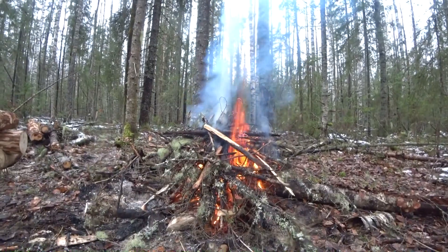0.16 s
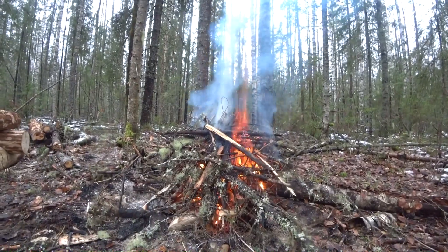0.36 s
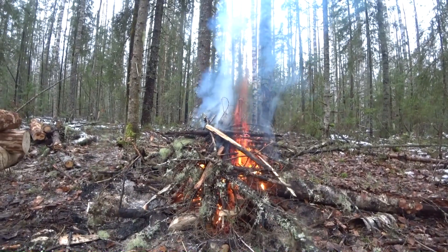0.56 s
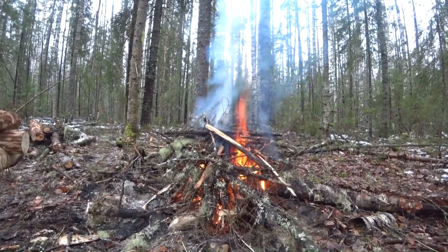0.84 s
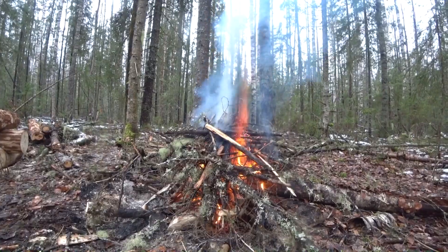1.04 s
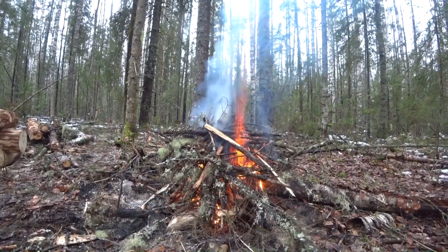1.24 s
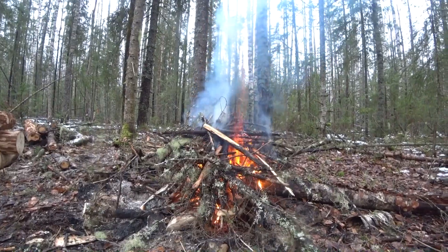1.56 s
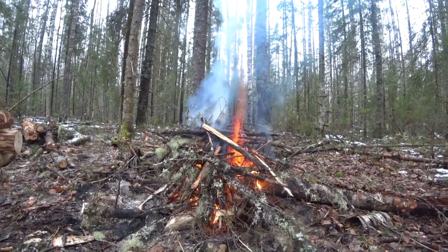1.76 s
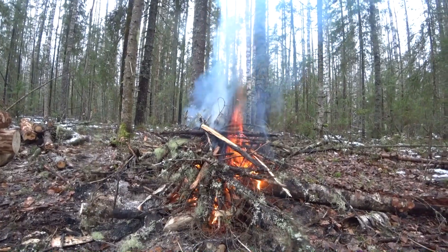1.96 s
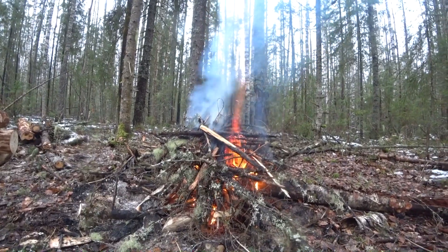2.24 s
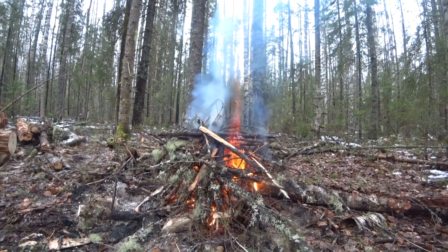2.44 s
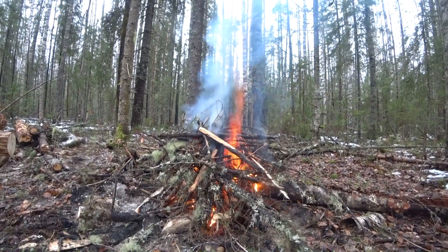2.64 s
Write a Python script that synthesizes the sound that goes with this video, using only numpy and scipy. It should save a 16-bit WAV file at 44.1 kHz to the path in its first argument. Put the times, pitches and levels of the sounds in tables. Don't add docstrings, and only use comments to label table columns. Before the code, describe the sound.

Sharp bright fire pops come in uneven clusters from the start, the strongest near the middle, with fine ticking between them; quiet steady hiss and low rumble sit beneath, outdoors, close stereo microphone, slight scatter from trees.

```python
import sys
import numpy as np
from scipy import signal
from scipy.fft import rfft, irfft, next_fast_len
from scipy.io import wavfile

SR = 44100
rng = np.random.default_rng(int(sys.argv[2]) if len(sys.argv) > 2 else 0)


def transcribe(signal):
    frames = np.atleast_2d(signal).T
    limited = np.clip(frames, -1, 1)
    pcm = np.round(limited * 32767).astype(np.int16)
    wavfile.write(sys.argv[1], SR, pcm)


def amplitude_ratio(level_db):
    exponent = np.asarray(level_db, float) / 20
    return 10 ** exponent


N = 123479

# start in [s], peak in [dB],
# ring in [Hz], thump relative to the peak in [dB].
SNAPS = [(0.2207, -20.5, 3300, -38), (0.2474, -15.5, 6160, -19), (0.2918, -9.5, 4700, -12),
         (0.2944, -9.5, 6650, -32), (0.43, -17, 4060, -22), (0.4945, -13, 6500, -51),
         (0.5039, -11.5, 6160, -47), (0.638, -16.5, 4220, -29), (0.7873, -14, 5130, -19.5),
         (0.7958, -8, 5020, -62.5), (0.8499, -17.5, 5400, -44), (0.8746, -15, 5060, -26),
         (0.9639, -16, 2830, -49), (1.0007, -17, 7500, -44), (1.0094, -21, 6600, -26),
         (1.0108, -12.5, 5100, -24), (1.029, -20, 4300, -17), (1.2717, -15, 7460, -54),
         (1.4167, -11.5, 7800, -58), (1.5104, -6.5, 4700, -58), (1.5126, -12, 6070, -40),
         (1.5136, -21, 2550, -47), (1.5201, -15.5, 3980, -40), (1.5275, -21, 3600, -40),
         (1.6133, -19.5, 4300, -29), (1.7128, -9.5, 6780, -27.5), (1.7667, -13.5, 6000, -59),
         (1.9983, -17.5, 3830, -18.5), (2.0203, -13, 9700, -26), (2.0211, -11.5, 4530, -32),
         (2.29, -16, 4760, -22), (2.2928, -11, 4700, -14.5), (2.3269, -19, 4700, -43),
         (2.5028, -8.5, 6200, -55.5), (2.5226, -14.5, 4500, -14), (2.5366, -16, 6400, -53)]
# start in [s], peak in [dB], ring in [Hz].
EARLY_TICKS = [(0.0303, -32.5, 1680), (0.0332, -27, 6900), (0.074, -27, 900), (0.093, -28, 6600),
               (0.1012, -21.5, 6960), (0.197, -30.5, 7060), (0.2308, -30, 3250), (0.2326, -22, 7600),
               (0.2376, -35.5, 6290), (0.241, -27.5, 4600), (0.2888, -32, 5270), (0.3137, -26, 900),
               (0.3513, -22.5, 5540), (0.376, -24, 6550), (0.4079, -19, 5230), (0.4082, -24.5, 5500),
               (0.434, -49, 7240), (0.4455, -23, 3060), (0.4731, -23.5, 930), (0.521, -21.5, 920),
               (0.5414, -23, 5320), (0.5558, -23, 3950), (0.5997, -23, 4900), (0.609, -26.5, 7160),
               (0.6364, -27, 8500), (0.6442, -34, 6420), (0.7015, -20, 7000), (0.7084, -14, 6700),
               (0.715, -27, 2800), (0.734, -27, 4910)]
MIDDLE_TICKS = [(0.7532, -21, 6740), (0.7664, -26.5, 6700), (0.771, -34, 5860), (0.775, -29, 2330),
                (0.7822, -13, 6800), (0.8393, -25.5, 2540), (0.843, -28.2, 6600), (0.846, -37, 5640),
                (0.858, -40, 4610), (0.8647, -25, 8100), (0.8692, -24, 6600), (0.889, -32, 7280),
                (0.9, -23.5, 940), (0.9618, -25.5, 6000), (0.9741, -28, 6200), (0.9933, -24.5, 4400),
                (1.0331, -28, 910), (1.115, -20, 6640), (1.126, -32, 5040), (1.201, -26.5, 5300),
                (1.2092, -20.5, 7780), (1.2241, -17.5, 1550), (1.233, -27.5, 4900), (1.261, -25, 6100),
                (1.316, -28, 7600), (1.3471, -22, 5000), (1.4413, -21, 7200), (1.4603, -25.5, 4040),
                (1.472, -28, 6400), (1.5426, -21, 1500)]
LATE_TICKS = [(1.5578, -26, 6060), (1.6052, -29, 4530), (1.6627, -27.5, 4160), (1.673, -26, 2410),
              (1.6863, -21.5, 5650), (1.7003, -21.5, 5030), (1.8062, -39, 6850), (1.8887, -19.5, 5350),
              (1.9255, -23.5, 2500), (2.0297, -27, 5210), (2.0568, -34, 2470), (2.1262, -34.5, 2480),
              (2.1539, -21.5, 7740), (2.1897, -25, 4660), (2.1962, -28.5, 5600), (2.2095, -32, 6400),
              (2.2753, -29, 2220), (2.302, -26, 4600), (2.3111, -22, 2900), (2.3196, -21, 6000),
              (2.3627, -28.5, 5210), (2.4768, -37, 4670), (2.4851, -27, 7000), (2.5608, -34, 5680),
              (2.5719, -28.5, 6000), (2.681, -25, 6600), (2.6992, -22.5, 7240), (2.7031, -21.5, 5840),
              (2.7196, -24.5, 2550), (2.766, -24.5, 6500), (2.7783, -32.5, 6840)]
# delay in [s], level in [dB].
ECHO_PATHS = [
    (.0031, -12),
    (.0097, -14),
    (.0170, -25),
    (.0197, -29),
]
# start in [s], peak in [dB], mode in [Hz], T60 in [s].
WOOD_MODES = [(0.2918, -14, 4800, 0.0076), (0.293, -14, 6020, 0.013), (0.292, -27.5, 153.6, 0.02),
              (0.2944, -19.5, 1050, 0.0049), (0.2948, -9, 7240, 0.0083), (0.294, -18.5, 1740, 0.013),
              (0.9646, -35, 2780, 0.011), (1.0294, -20.5, 1215, 0.012), (1.0276, -19, 215, 0.012),
              (1.2239, -27.5, 1450, 0.0134), (1.5109, -17.5, 1640, 0.017), (1.5104, -10, 2300, 0.013),
              (1.5104, -7, 1890, 0.0028), (1.5104, -13.5, 2990, 0.013), (1.5104, -14.5, 3525, 0.015),
              (1.5104, -20, 4430, 0.027), (1.5095, -18, 5980, 0.012), (1.5107, -25.5, 390, 0.02),
              (1.6133, -29, 1230, .007), (1.7128, -24, 3970, 0.01), (1.7667, -29.5, 2870, 0.016),
              (1.9252, -32.5, 810, 0.0055), (2.0194, -23.5, 1055, 0.0117), (2.021, -29.5, 2430, .012),
              (2.022, -21.5, 7460, 0.0089), (2.2928, -13.5, 4630, 0.009), (2.2927, -23, 5540, 0.0111),
              (2.2928, -23.5, 1915, 0.018), (2.293, -34, 142, .04), (2.5028, -21, 5200, 0.0078),
              (2.5228, -15, 2500, 0.01), (2.5226, -21, 1330, 0.0049), (2.5226, -16, 5720, 0.0088),
              (2.5228, -15.5, 8800, .005)]
# start in [s], rms level in [dB], T60 in [s].
STEAM_JETS = [
    (1.7, -41, 0.16),
    (1.8, -43, 0.088),
    (0.293, -41, .1),
]
# start in [s], peak in [dB].
SHARP_FRONTS = [(0.2474, -32), (0.376, -30), (0.4258, -32), (0.4945, -30), (0.5039, -15), (0.5558, -28),
                (1.0007, -25), (1.2717, -21), (1.5104, -15), (1.6867, -30), (1.7128, -13), (1.7667, -36),
                (1.8892, -33), (2.0205, -12), (2.29, -22), (2.5028, -12), (2.5226, -25), (2.5366, -11),
                (2.799, -26)]
# time in [s], hiss level in [dB].
BURN_VIGOUR = [
    (0.0, -53),
    (0.31, -53.5),
    (2.8, -57),
]
# frequency in [Hz], density in [dB per Hz].
HISS_SPECTRUM = [(240, -15), (400, -5.5), (1230, -2), (2560, -5), (3780, -10), (5980, -4.5), (11000, -11.5),
                 (14300, -40), (22000, -120)]
# frequency in [Hz], density in [dB per Hz].
FLAME_SPECTRUM = [(12, -34), (20, -4.5), (53, 1), (123, -0.5), (462, -20), (700, -20), (910, -26.5),
                  (1540, -120)]
# frequency in [Hz], likeness in [-1..1, clipped].
NOISE_LIKENESS = [(60, 2), (220, 1.2), (450, -0.46), (900, -1), (1800, -0.77), (5000, 0.94), (11000, -0.03)]
# frequency in [Hz], lead of the left in [rad].
PORT_LEAD_RAD = [(80, .3), (260, .55), (900, 1.05), (1700, .95), (5000, .3), (10000, .05)]

POP_LIKENESS = 0.85
BURST_SAMPLES = 3300


def rms_one(x):
    return x / np.sqrt(np.mean(x ** 2) + 1e-20)


def top_one(x):
    return x / abs(x).max()


def at_hz(points, hz):
    table_hz, values = np.transpose(points)
    return np.interp(np.log(hz), np.log(table_hz), values)


def drift(rate_hz):
    r = np.exp(-2 * np.pi * rate_hz * 40 / SR)
    white = rng.standard_normal(N // 40 + 2002)
    slow = signal.lfilter([1], [1, -2 * r, r * r], white)[2000:]
    return np.interp(np.arange(N) / 40, np.arange(len(slow)), rms_one(slow))


def ring(x, hz, t60_s):
    r, w = amplitude_ratio(-60 / (t60_s * SR)), 2 * np.pi * hz / SR
    return signal.lfilter([0, np.sin(w)], [1, -2 * r * np.cos(w), r * r], x + 1e-18)


def band(x, low_hz, high_hz):
    return signal.sosfilt(signal.butter(2, [low_hz, high_hz], "band", fs=SR, output="sos"), x)


def pair(mid, side, alike):
    alike = np.clip(alike, -1, 1)
    shared = np.sqrt(1 + alike) * mid
    opposed = np.sqrt(1 - alike) * side * [[1], [-1]]
    return (shared + opposed) / np.sqrt(2)


def pocket_crack(click, ring_hz):
    crack_db, ring_full_hz = 1.5, 6000
    t60_s = 2.2 / (0.2 * ring_hz + 700)
    rung = ring(ring(click, ring_hz, t60_s), ring_hz * 1.12, t60_s)
    cavity = min(1, ring_hz / ring_full_hz) ** 0.6 * top_one(rung)
    crack = amplitude_ratio(crack_db) * top_one(band(click, 0.16 * ring_hz, ring_hz + 6000))
    return top_one(cavity + crack)


def burst(ring_hz, thump_db):
    twig_db, twig_t60_s, twigs_per_s = -10.5, 0.019, 4000
    trunk_db, trunk_t60_s, trunk_rise_s = -29, 0.072, 0.00054
    thump_hz, thump_gain_db = 228, -0.5
    t = np.arange(BURST_SAMPLES) / SR
    click = (t == 0) * 1.0
    direct = pocket_crack(click, ring_hz)

    hit = rng.random((2, len(t))) < twigs_per_s / SR
    twigs = rng.standard_normal((2, len(t))) * hit * amplitude_ratio(twig_db - 60 * t / twig_t60_s)
    bright = band(direct, 1000, 12000)[None, :512]
    near = signal.fftconvolve(pair(*twigs, POP_LIKENESS), bright, axes=1)[:, :len(t)]

    trunks = rms_one(band(rng.standard_normal((2, len(t))), 1300, 9500))
    far = amplitude_ratio(trunk_db - 60 * t / trunk_t60_s) * trunks * np.minimum(t / trunk_rise_s, 1)
    thump = amplitude_ratio(thump_db + thump_gain_db) * top_one(band(click, thump_hz / 2, thump_hz * 2))
    return top_one(direct + near) - thump + far


def pops():
    tick_thump_db, pan_spread_db = -25, 0.7
    out = np.zeros((2, N + 4096))
    ticks = [(*row, tick_thump_db) for row in list(EARLY_TICKS) + list(MIDDLE_TICKS) + list(LATE_TICKS)]
    for start_s, peak_db, ring_hz, thump_db in list(SNAPS) + ticks:
        i = int(start_s * SR)
        pan_db = pan_spread_db * rng.standard_normal() * np.array([[1], [-1]])
        out[:, i:i + BURST_SAMPLES] += amplitude_ratio(peak_db + pan_db) * burst(ring_hz, thump_db)
    return out[:, :N]


def echoes(x):
    dull = band(x, 1930, 7600)
    out = np.zeros((2, N))
    for delay_s, level_db in ECHO_PATHS:
        for side in range(2):
            lag = int(delay_s * SR) + 5 * side
            out[side, lag:] += amplitude_ratio(level_db) * dull[side, :N - lag]
    return out


def knocks():
    out = np.zeros(N + 4096)
    click = (np.arange(BURST_SAMPLES) == 0) * 1.0
    for start_s, peak_db, hz, t60_s in WOOD_MODES:
        i = int(start_s * SR)
        mode = band(ring(click, hz, t60_s), 0.55 * hz, 1.8 * hz)
        out[i:i + BURST_SAMPLES] += amplitude_ratio(peak_db) * mode
    return out[:N]


def sizzle():
    t = np.arange(N) / SR
    grain = rng.standard_normal((2, N)) * amplitude_ratio(7.4 * drift(100))
    fade = 0
    for start_s, rms_db, t60_s in STEAM_JETS:
        fade = fade + amplitude_ratio(rms_db - 60 * np.maximum(t - start_s, 0) / t60_s) * (t > start_s)
    return fade * rms_one(band(pair(*grain, POP_LIKENESS), 2500, 8500))


def fronts():
    start_s, peak_db = np.transpose(SHARP_FRONTS)
    clicks = np.zeros(N)
    clicks[(start_s * SR).astype(int)] = amplitude_ratio(peak_db)
    return 4 * band(band(clicks, 11500, 19000), 10000, 14000) * amplitude_ratio([[1], [-1]])


def fizz(vigour_db):
    ticks_per_s, level_db, spread_db, clump_db = 400, -56.5, 3.3, 1.3
    sizes = amplitude_ratio(spread_db * np.minimum(rng.exponential(1, N), 3)) * rng.choice([-1, 1], N)
    born = rng.random(N) < ticks_per_s * amplitude_ratio(clump_db * drift(15)) / SR
    pitch, out = rng.integers(0, 14, N), 0
    for k, hz in enumerate(np.geomspace(1800, 9000, 14)):
        rung = ring(sizes * born * (pitch == k), hz, 3.5 / hz)
        out = out + rung * np.sqrt(hz) * amplitude_ratio(rng.standard_normal((2, 1)))
    return amplitude_ratio(level_db + vigour_db) * rms_one(out)


def banded_noise(spectrum, patchy_db):
    out, together = 0, drift(13.6)
    edges_hz = 18 * 2 ** np.arange(0, 9.6, 0.5)
    white = rng.standard_normal((2, 2, N))
    for k, (low_hz, high_hz) in enumerate(zip(edges_hz, edges_hz[1:])):
        hz = np.sqrt(low_hz * high_hz)
        flicker_db = patchy_db * (0.25 * together + 0.8 * drift(25))
        noise = pair(*band(white[k % 2], low_hz, high_hz), at_hz(NOISE_LIKENESS, hz))
        out = out + amplitude_ratio(at_hz(spectrum, hz) + flicker_db) * noise
    return rms_one(out)


def hiss(burn_db):
    return amplitude_ratio(burn_db + 3.5) * banded_noise(HISS_SPECTRUM, patchy_db=1.8)


def flame(vigour_db):
    return amplitude_ratio(-46.5 + vigour_db) * banded_noise(FLAME_SPECTRUM, patchy_db=0.7)


def scene():
    burn_s, hiss_db = np.transpose(BURN_VIGOUR)
    burn_db = np.interp(np.arange(N) / SR, burn_s, hiss_db)
    vigour_db = burn_db - burn_db.mean()

    crackle = pops()
    crackle = crackle + echoes(crackle) + knocks() + sizzle()
    crackle = signal.sosfilt(signal.cheby2(10, 50, 12900, fs=SR, output="sos"), crackle)
    bed = hiss(burn_db) + fizz(vigour_db)
    bed = signal.sosfilt(signal.cheby2(12, 40, 11500, fs=SR, output="sos"), bed)
    left_db = 0.65
    return (crackle + fronts() + bed + flame(vigour_db)) * amplitude_ratio([[left_db], [-left_db]])


def low_pass(x):
    return signal.sosfilt(signal.butter(12, 16600, fs=SR, output="sos"), x)


def record(dry):
    size = next_fast_len(N + 4096)
    hz = np.arange(size // 2 + 1) * SR / size + 1
    lead = np.exp(0.5j * at_hz(PORT_LEAD_RAD, hz) * [[1], [-1]])
    top = 1 / (1 + (hz / 11100) ** 90)
    top = top + amplitude_ratio(-24) / (1 + (hz / 12300) ** 14)
    top = top + amplitude_ratio(-32) / (1 + (hz / 16200) ** 40.0)
    rounded = dry / (1 + dry ** 8) ** 0.125
    heard = irfft(rfft(rounded, size) * lead * top, size)[:, :N]
    return low_pass(np.clip(heard, -1, 1))


dry = scene()
out = record(dry)
transcribe(out)
```